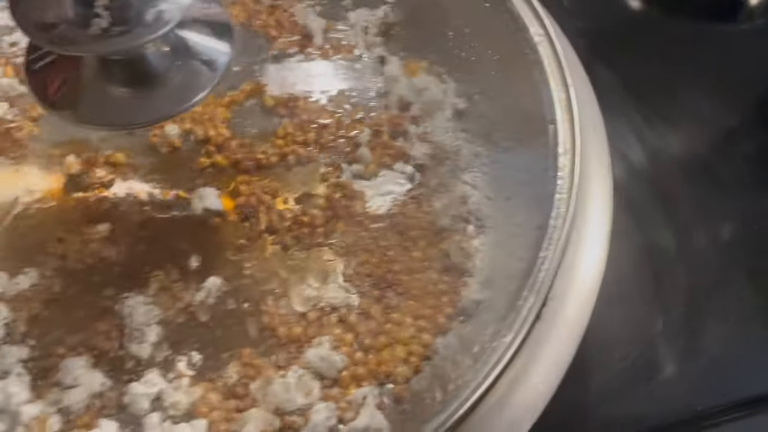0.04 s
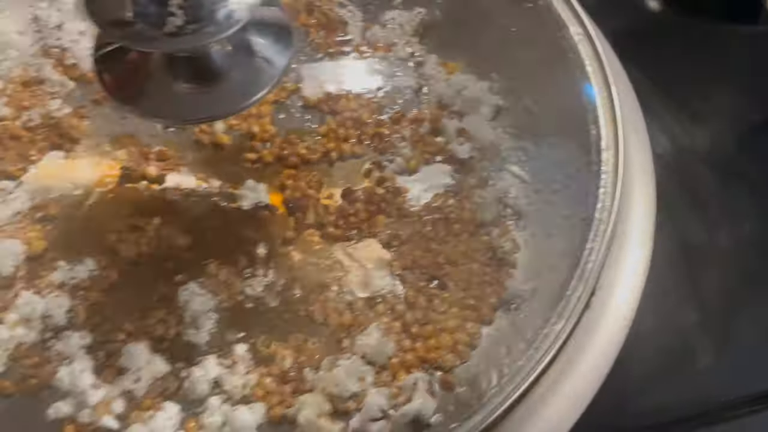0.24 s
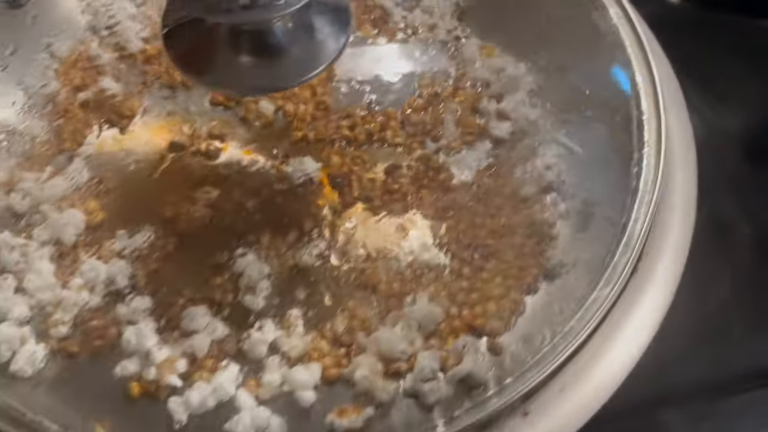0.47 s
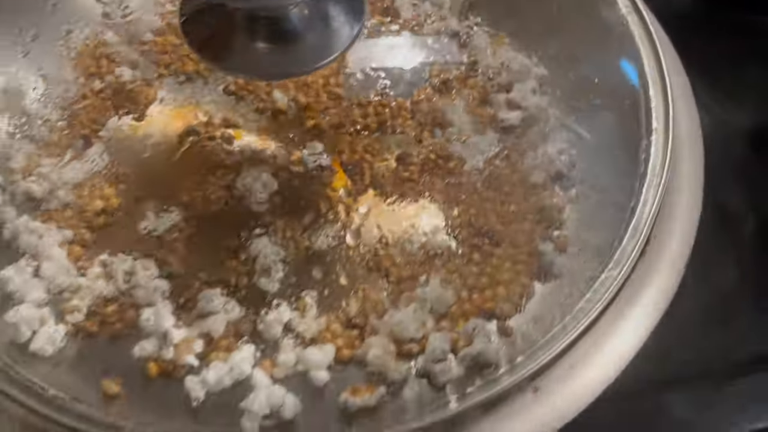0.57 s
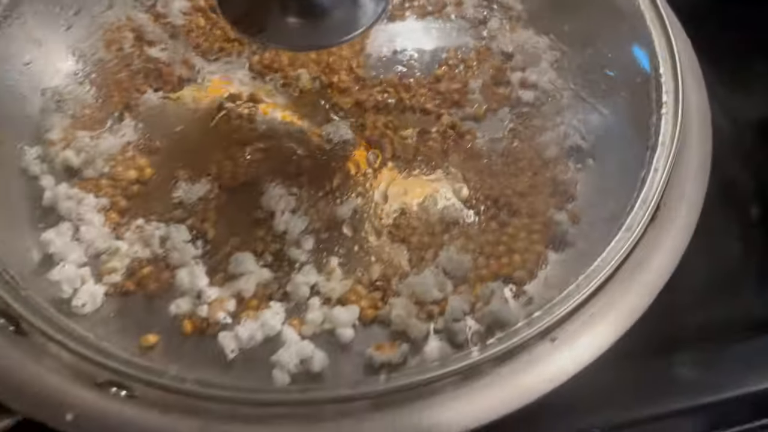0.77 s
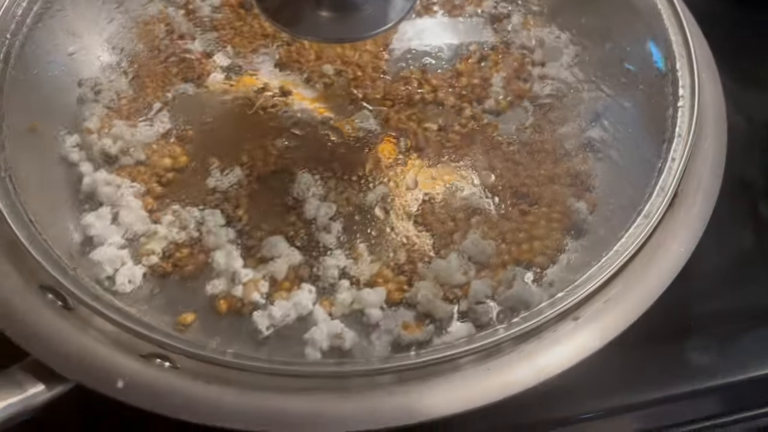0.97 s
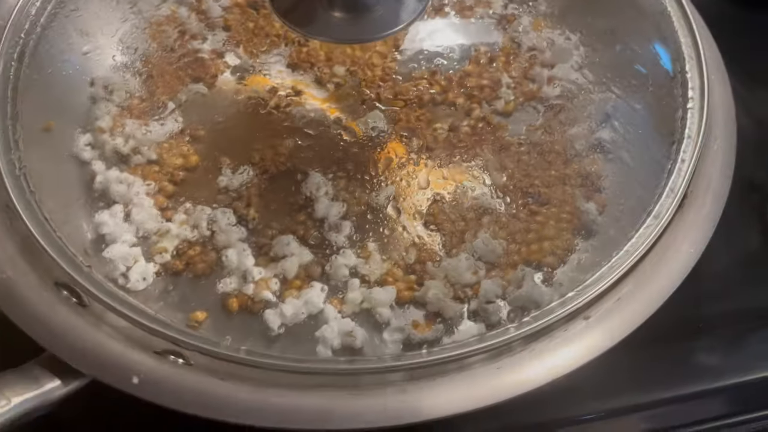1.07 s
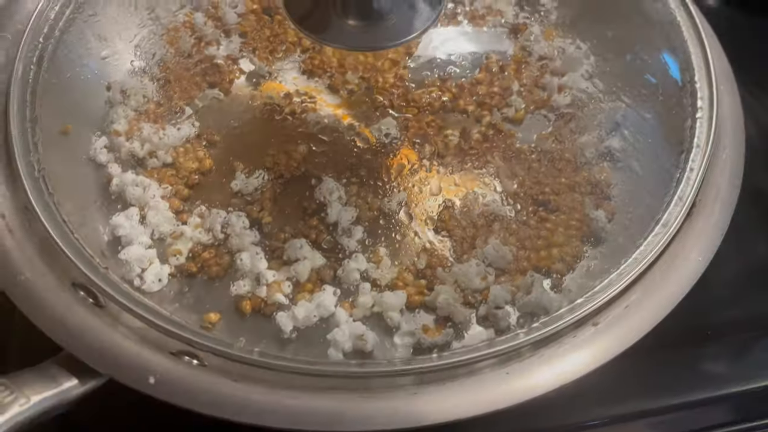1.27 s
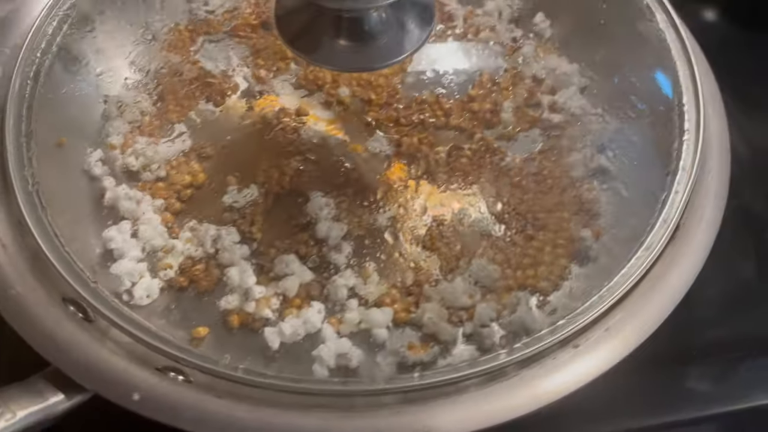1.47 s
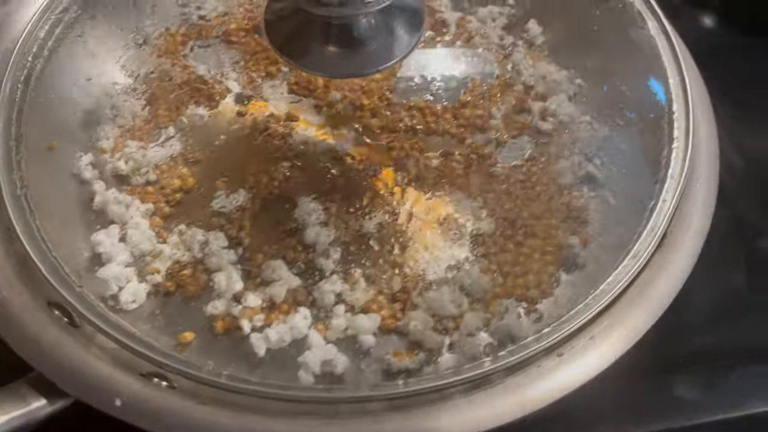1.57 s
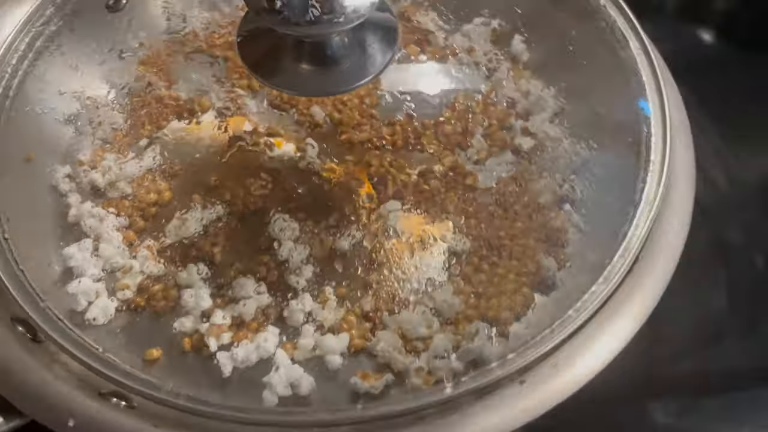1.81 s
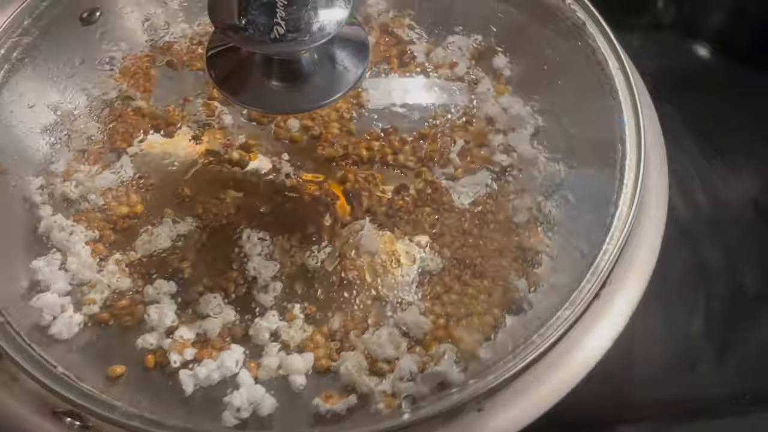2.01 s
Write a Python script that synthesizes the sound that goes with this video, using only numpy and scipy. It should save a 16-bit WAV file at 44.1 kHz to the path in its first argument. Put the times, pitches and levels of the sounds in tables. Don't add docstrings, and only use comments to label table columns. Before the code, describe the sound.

Popcorn kernels burst under a glass lid with snappy pops, light rattles and faint oil sizzle

```python
import sys
import numpy as np
from scipy import signal
from scipy.fft import rfft, irfft, next_fast_len
from scipy.io import wavfile
from scipy.ndimage import uniform_filter1d

SR = 44100
rng = np.random.default_rng(int(sys.argv[2]) if len(sys.argv) > 2 else 0)


def attenuation_scalar(level_db):
    decades = np.asarray(level_db, float) / 20
    return 10 ** decades


def persist_wave(psi):
    counts = np.round(np.clip(psi, -1, 1) * 32767).astype(np.int16)
    wavfile.write(sys.argv[1], SR, np.atleast_2d(counts).T)


N = 90404


def evened(x):
    return x / np.sqrt(np.mean(x ** 2) + 1e-20)


def read(points, hz):
    f, value = np.transpose(points)
    return np.interp(np.log(hz + 1), np.log(f + 1), value)


def add(mix, start_s, sound):
    part = mix[round(start_s * SR):][:len(sound)]
    part += sound[:len(part)]


def colour(x, gain):
    size = next_fast_len(N + 2048)
    return irfft(rfft(x, size) * gain(np.fft.rfftfreq(size, 1 / SR)), size)[..., :N]


def causal(db):
    log = db * np.log(10) / 20
    mirrored = np.r_[log, log[-2:0:-1]]
    return np.exp(np.conj(signal.hilbert(mirrored)))[:len(db)]


def ring(hz, db, t60_s, rise_s, length_s, phase=0, shake=1):
    t = np.arange(0, length_s, 1 / SR)[:, None]
    envelope = shake * attenuation_scalar(db - 60 * t / t60_s) * (1 - np.exp(-t / rise_s))
    return (envelope * np.sin(2 * np.pi * hz * t + phase)).sum(1)


def ports(x, lean):
    # frequency in Hz, left's phase lead in radians.
    lead = [(300, .2), (1500, 2.6), (2200, .2), (3200, 1.2), (5200, .5), (5700, -1.2), (6800, -1.2),
            (8400, -3.14), (13500, -6.2)]

    def half(hz):
        return np.exp(.5j * read(lead, hz)) * attenuation_scalar(.5 * read(lean, hz))

    left = colour(x[0], half)
    right = colour(x[-1], lambda hz: 1 / half(hz))
    return np.array([left, right])


def hiss():
    # frequency in Hz, room rumble density in dB per Hz.
    rumble_density = [(25, -12), (45, 3), (70, 3.5), (110, -17.5), (220, -7.5), (400, -10.5), (550, -13.5),
                      (700, -22)]
    # frequency in Hz, oil sizzle density in dB per Hz.
    sizzle_density = [(700, -17), (1500, -22.5), (3000, -27.5), (6000, -29), (8300, -25), (10000, -29),
                      (12400, -24.5), (15300, -32)]
    # frequency in Hz, drift of the patches in dB.
    patch_drift = [(100, 1), (500, 1.5), (2000, 4), (8000, 2.5), (12000, 4)]
    # frequency in Hz, likeness of the two ports from -1 to 1.
    likeness = [(60, 0.97), (200, 0.96), (900, 0.12), (2000, 0.78), (6500, 0.21), (8300, 0.94),
                (10500, 0.58), (13000, 0.96)]
    # hum line in Hz, level in dB, wobble in dB.
    hum_lines = [(37.7, -59, 1.5), (59.5, -54.5, 1.5), (394, -69, 2.)]
    hiss_db, flicker_db, top_hz = -48, 1.1, 15850

    frames, hz = N // 256 + 5, np.fft.rfftfreq(1024, 1 / SR)
    a, b, c, d, patches = rng.standard_normal((frames, 513, 5)).T
    patches = uniform_filter1d(patches, 10, 0)
    patches = evened(uniform_filter1d(patches, 10, 1))
    flicker = evened(uniform_filter1d(rng.standard_normal(frames), 3))

    same = np.clip(read(likeness, hz), -1, 1)[:, None]
    left = a + 1j * b
    right = same * left + np.sqrt(1 - same ** 2) * (c + 1j * d)
    density_db = read(rumble_density[:-1] + sizzle_density, hz) - 40 * (hz > top_hz)
    drift_db = read(patch_drift, hz)[:, None] * patches + flicker_db * flicker
    z = np.array([left, right]) * attenuation_scalar(density_db[:, None] + drift_db)
    noise = signal.istft(z, nperseg=1024, noverlap=768)[1][:, :N]
    out = attenuation_scalar(hiss_db) * evened(noise)

    t = np.arange(N) / SR
    for line_hz, db, wobble_db in hum_lines:
        slow = evened(colour(rng.standard_normal(N), lambda f: f < 6))
        line = np.sin(2 * np.pi * line_hz * t + 0.95 * slow[::-1])
        out = out + attenuation_scalar(db + 6 + wobble_db * slow) * line
    return out


def kitchen(x):
    # frequency in Hz, t60 in seconds.
    room_t60 = [(200, 0.11), (1000, 0.46), (2500, 0.4), (6000, 0.35), (14000, 0.11)]
    taps = np.zeros((2, SR // 2))
    jitter = rng.integers(0, 20, (2, (SR // 2 - 201) // 20))
    at = np.arange(200, SR // 2 - 20, 20) + jitter
    np.put_along_axis(taps, at, rng.choice([-1., 1.], at.shape), 1)
    hz, t, z = signal.stft(taps, SR, nperseg=256)
    decay = attenuation_scalar(-60 * t / read(room_t60, hz)[:, None])
    tail = signal.istft(z * decay, SR, nperseg=256)[1]
    tail = tail + .35 * tail[::-1]
    tail = tail / np.linalg.norm(tail[0])
    return signal.fftconvolve(x[None], tail, axes=1)[:, :N]


def spits():
    # start in seconds, level in dB.
    oil_ticks = [(0.201, -43), (.879, -47), (1.173, -45), (1.2565, -35.5), (1.2605, -42), (1.28, -63),
                 (1.3124, -40), (1.5453, -26), (1.7925, -31)]
    tick_t60_s = 0.014
    drip_s, drip_db, drip_hz, drip_fall_s, drip_length_s = 2.0415, -40.5, 1650, 0.0057, 0.0077

    out, t = np.zeros(N), np.arange(600) / SR
    noises = rng.standard_normal((len(oil_ticks), len(t)))
    for (start_s, db), noise in zip(oil_ticks, noises):
        add(out, start_s, attenuation_scalar(db - 60 * t / tick_t60_s) * np.gradient(noise))
    turns = drip_hz * drip_fall_s * (1 - np.exp(-t / drip_fall_s))
    swell = np.sin(np.pi * np.minimum(t / drip_length_s, 1))
    add(out, drip_s, attenuation_scalar(drip_db) * swell * np.sin(2 * np.pi * turns))
    return out


def strikes(hits, hz, modes, scatter_db, rattle_db):
    rise_s, rattle_t60_s, grain = .0006, 0.088, .55
    out, hz, (db, t60_s) = np.zeros(N), np.array(hz), np.transpose(modes)
    t = np.arange(4096) / SR
    f = np.fft.rfftfreq(len(t), 1 / SR) + 1
    chance = rng.standard_normal((len(hits), len(t) + 2 * len(hz)))
    flutter = uniform_filter1d(rng.standard_normal((13230, len(hz))), 130, axis=0)
    shake = 1 + grain * np.minimum(hz / 6000, 1) * evened(flutter)

    for (start_s, level_db, centre_hz, spread_oct, free), row in zip(hits, chance):
        noise = row[:len(t)]
        odd, phase = row[len(t):].reshape(2, -1)
        near_db = scatter_db * odd - 6 * (np.log2(hz / centre_hz) / spread_oct) ** 2
        tone = ring(hz, db + near_db, free * t60_s, rise_s, 13229.5 / SR, 2 * phase,
                    np.roll(shake, round(start_s * SR), axis=0))
        add(out, start_s, .5 * attenuation_scalar(level_db) * tone)

        band_gain = attenuation_scalar(-6 * (np.log2(f / centre_hz) / spread_oct) ** 2)
        band = evened(irfft(rfft(noise) * band_gain))
        decay_db = -60 * t / (rattle_t60_s * np.sqrt(free))
        add(out, start_s, .5 * attenuation_scalar(level_db + rattle_db + decay_db) * band * spread_oct)
    return out


def steel_pings():
    # start in seconds, level in dB, centre in Hz, spread in octaves, share of the free ring time.
    falls = [(.004, -42, 9300, 1.04, 1.2), (.013, -29.5, 6100, 0.2, 1.5), (.2, -41, 13500, 1.1, 1.5),
             (.21, -37, 7600, 0.33, 2.3), (.371, -39, 12430, 0.12, 2.8), (1.174, -51, 7300, 0.69, 0.18),
             (1.2266, -45.5, 3500, 1.3, 0.34), (1.322, -44, 3230, 0.32, 1.1),
             (1.5225, -24, 3820, 0.53, 1.1), (1.5447, -24.5, 4800, 0.83, 0.21),
             (1.5522, -24, 4400, 0.91, 0.16), (1.5682, -44, 11900, .1, 0.53),
             (1.969, -44.5, 3040, 0.54, 1.4), (2.026, -39, 2480, 0.18, 0.7), (.2435, -22, 5600, 0.65, 0.25),
             (1.409, -27, 2620, 0.19, 0.35), (1.565, -27, 2680, .15, 0.42), (1.7925, -21, 2760, 0.22, 0.33),
             (1.8145, -24, 2660, .12, 0.34), (1.232, -47, 12500, 0.62, .3), (1.92, -44, 4500, 0.55, 0.45),
             (.745, -47, 3000, 0.98, .5), (1.409, -14, 12500, .2, .1)]
    steel_hz = [2600, 3144, 3860, 4560, 5600, 6445, 6480, 7600, 8300, 11600, 11820, 11960, 14020, 15470]
    # level in dB, t60 in seconds.
    steel_modes = [(-6.5, 0.11), (-4, 0.094), (-10, 0.091), (-12, 0.24), (-17, 0.36), (-2.5, 0.15),
                   (-9, 0.16), (-1, 0.25), (7, 0.17), (-3, 0.3), (-2, 0.46), (-10, 0.43), (3, .25),
                   (2, 0.09)]
    return strikes(falls, steel_hz, steel_modes, scatter_db=1.5, rattle_db=-0.5)


def lid_knocks():
    # start in seconds, level in dB, centre in Hz, spread in octaves, share of the free ring time.
    taps = [(.237, -29.5, 2700, 0.68, 0.55), (0.247, -20, 4400, 0.45, 0.72), (.2481, -23, 1730, 0.58, 0.39),
            (.3352, -26.5, 2080, 0.69, 0.75), (.247, -23, 3560, 0.085, 1.5), (.495, -26, 4200, 0.73, 0.72),
            (.496, -32, 1140, 0.81, 0.78), (0.5255, -32.5, 3240, 0.73, 0.59),
            (.538, -13.5, 4700, 1.17, 0.27), (.543, -23, 1740, 1.01, 0.83), (.66, -43.5, 1910, 0.65, 0.41),
            (1.409, -21, 2580, 0.69, 0.43), (1.4102, -28, 1000, 0.51, 0.94),
            (1.411, -25.5, 4800, 0.27, 0.77), (1.498, -29.5, 1100, 0.34, 0.58),
            (1.5442, -27.5, 1810, 0.6, 0.51), (1.656, -47.5, 2330, 0.75, 0.89),
            (1.789, -31.5, 3900, 1.54, 0.19), (1.7951, -37.5, 4000, 0.7, 1.04),
            (1.8146, -30.5, 2460, 0.36, 0.78), (1.854, -43, 2230, 0.6, 0.32),
            (1.4985, -33, 3400, 1.1, 0.57), (.3355, -29, 4100, 0.13, 0.95), (.337, -23, 5900, 0.19, 0.61),
            (.409, -44, 4000, .7, 0.6), (1.41, -26, 705, .15, 0.33), (1.898, -49, 1730, 0.49, 0.57),
            (1.918, -50, 1300, 0.59, .5), (1.94, -45, 2270, 0.24, .3), (1.973, -48.5, 1720, 0.57, 0.32)]
    glass_hz = [1104, 1701, 2275, 2818, 3385, 3526, 3965, 4060, 4330, 4665, 4950, 5200, 5873, 6560]
    # level in dB, t60 in seconds.
    glass_modes = [(12.5, 0.055), (0, 0.1), (-0.5, 0.15), (-3, 0.095), (0, 0.06), (-6.5, 0.094), (2, 0.097),
                   (-7.5, 0.075), (4, 0.036), (0, 0.091), (6, 0.024), (6.5, 0.034), (-4, 0.067), (-23, .06)]
    return strikes(taps, glass_hz, glass_modes, scatter_db=1.1, rattle_db=-2.5)


def bursts():
    pop_s = [.2464, .3346, .4946, .537, 1.4086, 1.4974, 1.7942]
    # crack in dB, split length in seconds, thump in dB, thump lag in seconds,
    # share of the air's ring time.
    pops = [
        (-9, 0.004, -22.5, 0.00162, 0.56),
        (-18.5, 0.0093, -18.5, 0.00257, 0.81),
        (-11, 0.0018, -12, 0.00227, 0.97),
        (-9, 0.0073, -11, 0.007, 0.9),
        (-14.5, 0.00066, -16.5, 0.00546, 0.95),
        (-18, 0.00083, -16.5, 0.00288, 1.35),
        (-18, 0.0036, -24, 0.0031, 0.84),
    ]
    # start in seconds, level in dB.
    snaps = [(.2472, -14), (.2488, -6), (0.2485, -16), (0.251, -11), (.4953, -20), (.5381, 4), (0.5377, -5),
             (0.539, -2), (0.545, -5), (1.2566, -25), (1.311, -25), (1.4093, -10.5), (1.4112, -13),
             (1.412, -22), (1.4979, -4), (1.7971, -15), (1.7964, -16)]
    # start in seconds, level in dB, share of the air's ring time.
    puffs = [(0.234, -34.5, .6), (1.816, -32.5, 0.54)]
    # start in seconds, length in seconds, pitch in Hz, level in dB.
    moans = [(0.152, 0.13, 280.3, -49), (1.886, 0.19, 298.3, -52.5)]
    # frequency in Hz, level in dB, t60 in seconds.
    air_modes = [(278.4, 10.5, 0.023), (298, -3, 0.06), (207.6, -7, 0.052), (121, -6, 0.069),
                 (86.6, -9, 0.052), (486, -20.5, 0.082)]
    # frequency in Hz, level in dB.
    crack_gain = [(300, 7), (1000, -12), (3000, -22.5), (6500, 6), (9000, 8), (12500, 4.5), (15000, 1.5),
                  (17000, -49)]
    spike_db, snap_gain, crack_t60_s = 3.5, 2.2, 0.04
    fizz_db, fizz_t60_s, rise_cycles = -8.5, 0.024, 0.62

    cracks, thumps, t = np.zeros(N), np.zeros(N), np.arange(4000) / SR
    air_hz, air_db, air_t60_s = np.transpose(air_modes)
    chance = rng.standard_normal((len(pops), 2, len(t)))
    spikes = rng.exponential(1, (len(pops), len(t) // 20)).repeat(20, axis=1)
    puffs_all = list(puffs)
    for start_s, pop, (a, b), spike in zip(pop_s, pops, chance, spikes):
        db, length_s, thump_db, lag_s, free = pop
        puffs_all.append((start_s + lag_s, thump_db, free))
        uneven_db = spike_db * (np.minimum(spike, 4) - 2)
        split = a * attenuation_scalar(uneven_db - 60 * np.maximum(t - length_s, 0) / crack_t60_s)
        first_snap = snap_gain * np.sign(b) * np.exp(-((t - .0007) / .00025) ** 2)
        fizz = b * attenuation_scalar(fizz_db - 60 * t / fizz_t60_s)
        onset = np.minimum(t / 0.00015, 1)
        add(cracks, start_s, 0.34 * attenuation_scalar(db) * onset * (split + first_snap + fizz))
    for start_s, db in snaps:
        add(cracks, start_s, attenuation_scalar(db) * np.ones(1))

    for start_s, db, free in puffs_all:
        thump = ring(air_hz, air_db, free * air_t60_s, rise_cycles / air_hz, .15)
        add(thumps, start_s, -attenuation_scalar(db) * thump / abs(thump).max())
    for start_s, length_s, hz, db in moans:
        u = np.arange(0, length_s, 1 / SR)
        swell = np.sqrt(abs(np.sin(np.pi * u / length_s)))
        add(thumps, start_s, attenuation_scalar(db) * swell * np.sin(2 * np.pi * hz * u))
    return colour(cracks, lambda hz: causal(read(crack_gain, hz))) + thumps


def scene():
    # frequency in Hz, left minus right in dB.
    pan_lean = [(300, 2.8), (700, 4), (1200, 12), (1900, 10), (2400, 5), (4500, 7), (6000, 2), (8200, 0)]
    # frequency in Hz, left minus right in dB.
    floor_lean = [(60, 2), (5000, 2), (6000, 0)]
    kitchen_db = -18.5
    pan = bursts() + lid_knocks() + steel_pings() + spits()
    in_room = pan + attenuation_scalar(kitchen_db) * kitchen(pan)
    return ports(in_room, pan_lean) + ports(hiss(), floor_lean)


def low_pass(x):
    return signal.sosfilt(signal.butter(12, 16810, fs=SR, output="sos"), x)


def record(dry):
    low_cut_hz, edge_hz = 54.5, 16700
    low_cut = signal.butter(3, low_cut_hz, "high", fs=SR, output="sos")
    heard = signal.sosfilt(low_cut, dry)
    heard = colour(heard, lambda hz: 1 / (1 + (hz / edge_hz) ** 300))
    return low_pass(heard)


dry = scene()
out = record(dry)
persist_wave(out)
```